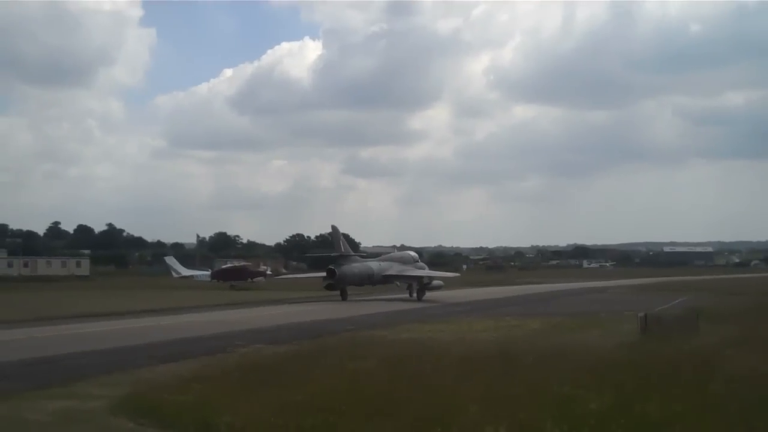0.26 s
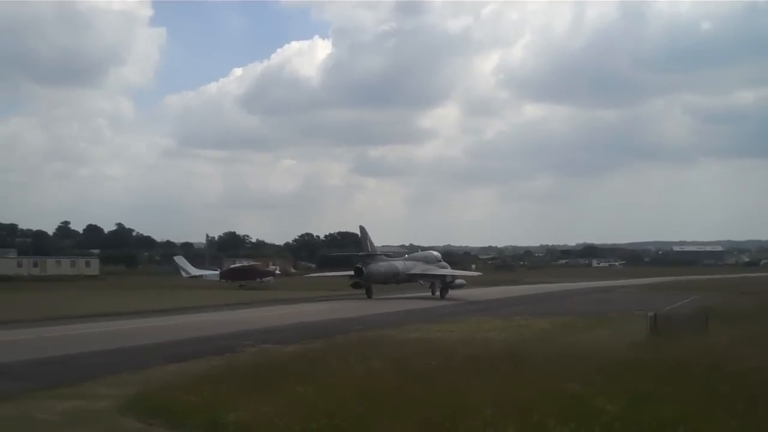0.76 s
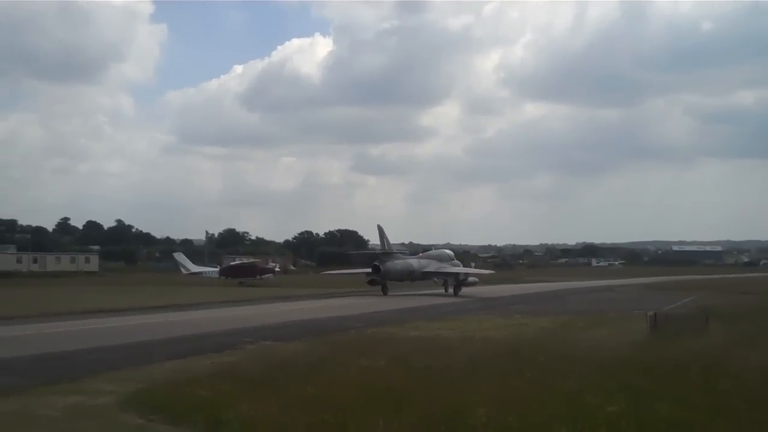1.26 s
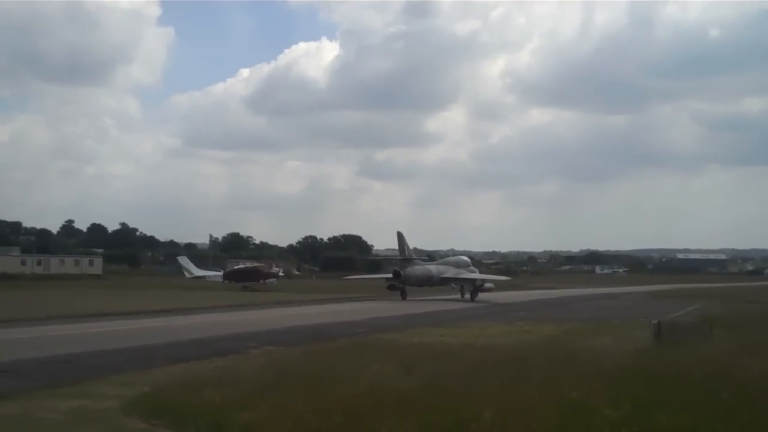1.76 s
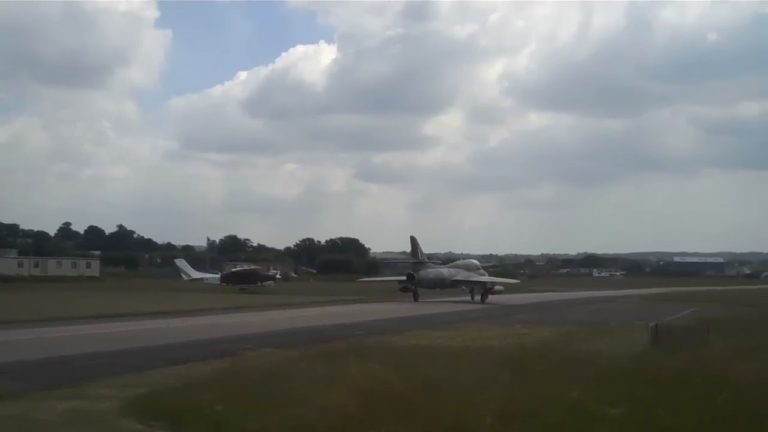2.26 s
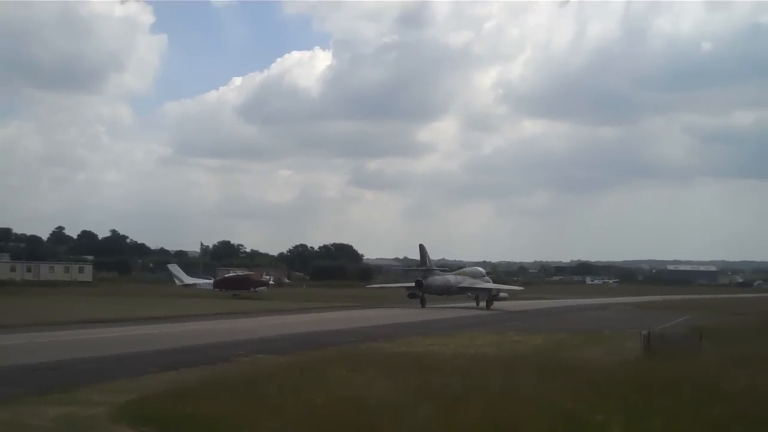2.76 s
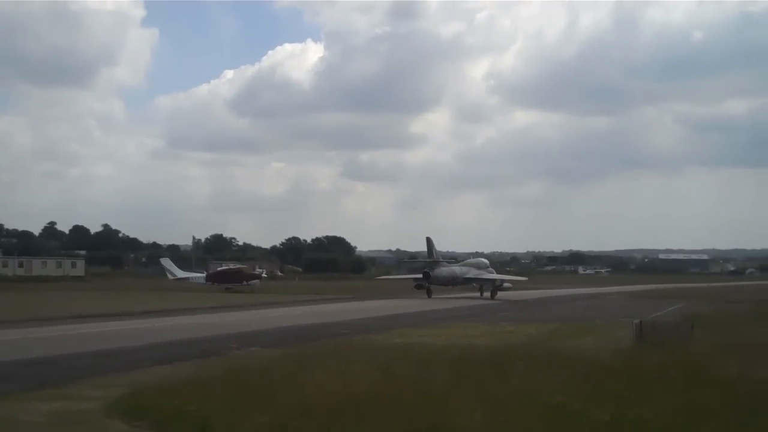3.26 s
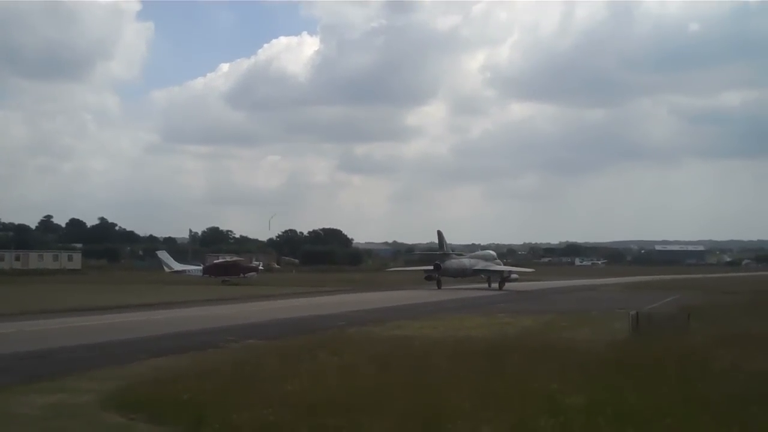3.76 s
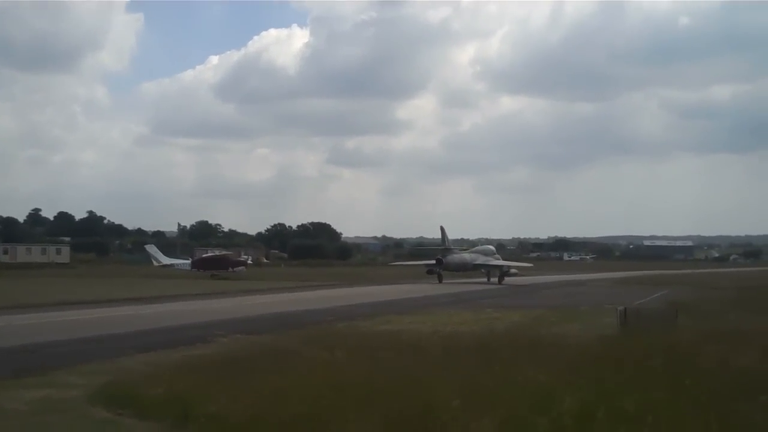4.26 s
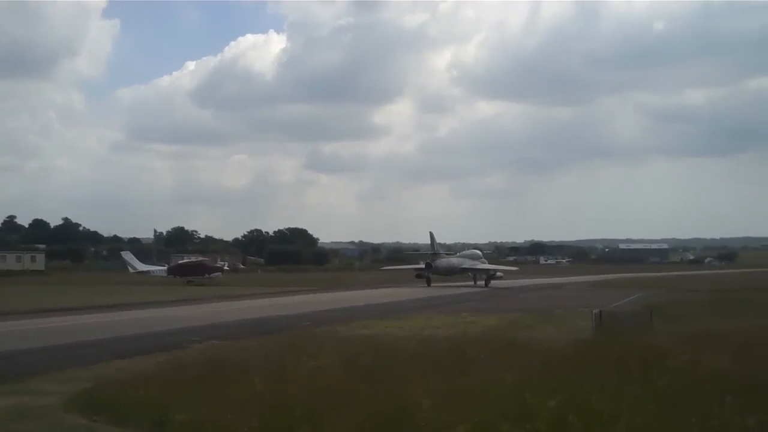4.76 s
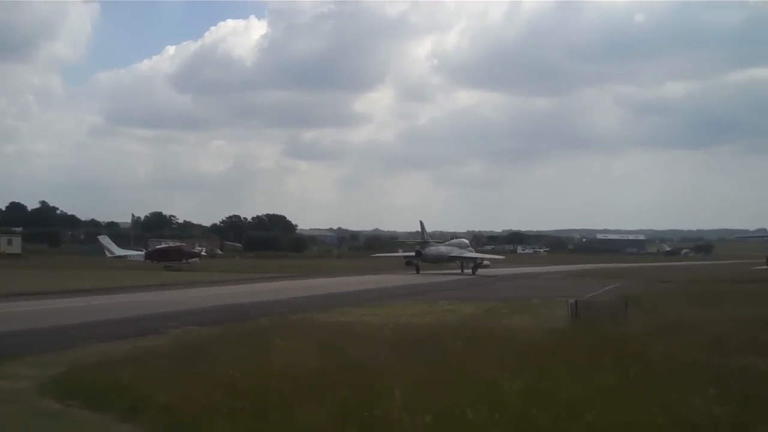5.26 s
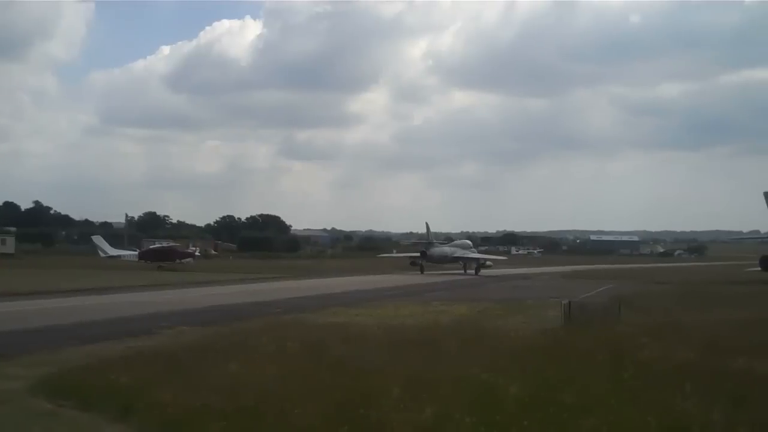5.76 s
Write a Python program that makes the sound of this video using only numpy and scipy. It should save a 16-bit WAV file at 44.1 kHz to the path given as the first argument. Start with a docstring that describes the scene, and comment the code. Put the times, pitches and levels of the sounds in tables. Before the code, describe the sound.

A jet taxis away on an airfield, its piercing whine sliding steadily lower over gusty hiss and hollow howl, with wind buffeting the microphone.

```python
"""A falling compressor whine over gusty hiss, a hollow howl and low roar: a jet taxis away, winding down.
Rotating blades give tones tied to one shaft; turbulent flow gives noise shaped by broad resonances.
Moving air makes the sound swell and swirl on its way, and level falls steadily with distance.
Wind adds rumble and short suction pulses at the microphone."""
import sys
import numpy as np
from scipy import signal
from scipy.fft import rfft, irfft
from scipy.io import wavfile

SR = 44100
rng = np.random.default_rng(int(sys.argv[2]) if len(sys.argv) > 2 else 0)


def unload_wav(signal):
    """Save mono or channel-first audio to the path in sys.argv[1] as 16-bit WAV at rate SR, clipped to [-1, 1]."""
    wavfile.write(
        sys.argv[1],
        SR,
        np.round(np.clip(np.atleast_2d(signal).T, -1, 1) * 32767).astype(np.int16),
    )


N = 264600
FRAME, HOP = 1024, 256  # samples
TIME = np.arange(N) / SR  # s
FRAME_S = np.arange(N // HOP + 5) * HOP / SR
BIN_HZ = np.fft.rfftfreq(FRAME, 1 / SR)
TREMBLE_HZ = 8

# blade-passing pitch of the first compressor stage: time_s, pitch_hz
BLADE_PITCH = [(0, 5795), (.5, 5780), (1.5, 5455), (2.1, 5286), (2.7, 5150), (3.6, 4995), (4.5, 4657),
               (5.4, 4438), (6, 4334)]
# how far the tail has turned to the listener: time_s, share (0-1)
TAIL_TURN = [(0, 0.04), (1.5, 0.27), (3.5, 0), (4.5, 0.93), (6, 0.99)]
# level of the blade sound as the jet turns, with peaks near 3.2 and 5.1 s: time_s, relative_level_db
BLADE_LEVEL = [(0, -5), (.45, -10), (.9, -2), (1.8, -3.5), (2.2, -2.5), (3.2, 2), (3.8, -1), (4.6, -0.5),
               (5.1, 2.5), (6, 0)]


def gain_of(db):
    """Level to amplitude: 20 dB is a factor of ten."""
    return 10 ** (np.asarray(db) / 20)


def evened(x):
    """Power normalization: scales to an rms of one."""
    return x / np.sqrt(np.mean(x ** 2) + 1e-20)


def curve(rows, t=TIME):
    """Linear interpolation: every column of a table, joined by straight lines in time."""
    s, *columns = np.transpose(rows)
    return [np.interp(t, s, c) for c in columns]


def colour(points):
    """Spectral envelope: dB at every bin, interpolated along log frequency."""
    hz, db = np.transpose(points)
    return np.interp(np.log(BIN_HZ + 1), np.log(hz + 1), db)


def hump(hz, width_hz):
    """Broad resonance: a peak in dB at every bin, 6 dB down at the edges of its width."""
    return -20 * np.log10(1 + (2 * (BIN_HZ - hz) / width_hz) ** 2)


def bell(s, length_s, t=TIME):
    """Gaussian envelope: a smooth rise and fall around one moment."""
    return np.exp(-((t - s) / length_s) ** 2)


def surges(rows, t=TIME):
    """Incoherent addition: the summed power of a table of smooth surges."""
    return sum(gain_of(db) ** 2 * bell(s, length_s, t) for s, db, length_s in rows)


def wander(rate_hz):
    """Low-passed Gaussian noise: a smooth random signal of unit rms."""
    hz = np.fft.rfftfreq(N, 1 / SR)
    low_pass = np.exp(-(hz / rate_hz) ** 2)
    return evened(irfft(rfft(rng.standard_normal(N)) * low_pass, N))


def swirl(span_s, span_hz):
    """Scattering by eddies: patches in time and frequency where sound is focused or weakened."""
    z = np.fft.rfft2(rng.standard_normal((len(FRAME_S), len(BIN_HZ))))
    per_s = np.fft.fftfreq(len(FRAME_S), HOP / SR)[:, None]
    per_hz = np.fft.rfftfreq(len(BIN_HZ), SR / FRAME)
    z *= np.exp(-(per_s * span_s) ** 2 - (per_hz * span_hz) ** 2)
    return evened(np.fft.irfft2(z, (len(FRAME_S), len(BIN_HZ))))


def turbulence(field_db):
    """Flow noise: random phases at steady unit power, coloured by a dB field over time and frequency."""
    real, imaginary = rng.standard_normal((2, len(FRAME_S), len(BIN_HZ)))
    shape = gain_of(field_db)
    frame_power_one = shape / np.linalg.norm(shape, axis=-1, keepdims=True)
    z = (real + 1j * imaginary) * frame_power_one
    return evened(signal.istft(z.T, nperseg=FRAME, noverlap=FRAME - HOP)[1][:N])


def path_db(follow):
    """Propagation: loss as the jet recedes, plus a share of the swelling and fading in moving air."""
    # how well moving air carries the sound: time_s, relative_level_db (at follow = 1)
    carry = [(0, 2), (.07, -0.5), (.16, -1), (.55, -2.5), (.8, 1), (1.2, 1.5), (1.92, 0.5), (2.48, 2),
             (2.97, -1.5), (3.2, 1.5), (3.56, 0.5), (3.84, -1), (3.94, 5), (4.1, 1.5), (4.27, 1.5),
             (4.32, -2.5), (4.5, 2), (5.15, 0), (5.78, -1), (6, 1)]
    recede_db_per_s = 1.0
    return follow * curve(carry)[0] - recede_db_per_s * TIME


def tone(hz, scatter, blur_hz):
    """Multipath: a direct path of wavering pitch plus a scattered part that blurs the spectral line."""
    turns = np.cumsum(hz + 12 * wander(42)) / SR
    paths = 1 + scatter * (wander(blur_hz) + 1j * wander(blur_hz))
    return evened((paths * np.exp(2j * np.pi * turns)).real)


def whine():
    """Blade-passing tones: stages on one shaft keep fixed pitch ratios; each trembles by itself."""
    # tones of the other compressor and turbine stages: multiple of the blade pitch
    stage_ratios = [1.06, 1.088, 1.13, 1.325, 1.352, 1.537, 1.643]
    # their levels before blade level and path: side_db, rear_db
    stage_levels = [(-46, -43), (-40.5, -44), (-52, -46), (-55, -51), (-56, -49), (-64, -55), (-63, -47)]
    # flares of the main tone when its direct path clears: centre_s, level_db, length_s
    flares = [(1.08, -37, 0.11), (1.68, -34, 0.071), (2.13, -32.5, 0.1), (2.35, -28, 0.035),
              (2.62, -31, 0.12), (2.99, -28, 0.025), (3.13, -29, .035), (3.25, -30, 0.07),
              (3.54, -35, 0.058), (4.17, -33.5, 0.069), (4.53, -33, 0.077), (5.1, -32.5, 0.063),
              (5.47, -43, 0.13)]
    (pitch_hz,), (blade_db,), (tail_on,) = curve(BLADE_PITCH), curve(BLADE_LEVEL), curve(TAIL_TURN)
    reach_db = blade_db + path_db(follow=1.0)
    tremble_db = 1.5  # rms
    main_db = -39.5 + reach_db + 1 * tail_on + tremble_db * wander(TREMBLE_HZ)
    main_level = np.sqrt(gain_of(main_db) ** 2 + surges(flares))
    out = main_level * tone(pitch_hz, scatter=0.76, blur_hz=44.5)
    for ratio, (side_db, rear_db) in zip(stage_ratios, stage_levels):
        turned_db = side_db + (rear_db - side_db) * tail_on
        stage_db = reach_db + turned_db + tremble_db * wander(TREMBLE_HZ)
        out += gain_of(stage_db) * tone(ratio * pitch_hz, scatter=3.6, blur_hz=49.7)
    return out


def blade_rush():
    """Blade-turbulence interaction: cutting through eddies spreads noise just above the blade pitch."""
    (pitch_hz,), (blade_db,) = curve(BLADE_PITCH, FRAME_S), curve(BLADE_LEVEL)
    patches_db = 2.5 * swirl(span_s=.06, span_hz=450)
    level = gain_of(-35 + blade_db + path_db(follow=2.3))
    return level * turbulence(hump(1.055 * pitch_hz[:, None], width_hz=930) + patches_db)


def intake():
    """Inlet flow noise and duct resonance: hiss, howl and fine fizz, swirled by the same moving air."""
    # broad hiss spectrum: frequency_hz, relative_density_db
    hiss_colour = [(900, -44), (1150, -8), (1420, -5.5), (1650, -6), (2200, -6), (2500, 0), (2800, 1),
                   (3130, -3.5), (3400, 0.5), (3850, -4), (4400, -3.5), (5500, -6.5), (6600, -58),
                   (9000, -63)]
    # fine treble spectrum: frequency_hz, relative_density_db
    fizz_colour = [(4000, -6), (5800, 2.5), (6600, 3), (7500, 1), (8700, -1.5), (9800, -6), (10900, -8),
                   (12000, -15), (13800, -29)]
    (tail_on,) = curve(TAIL_TURN)
    patches = swirl(span_s=0.067, span_hz=630)
    flutter_db = .7 * wander(16)
    howl_waver_db = 1.2 * wander(TREMBLE_HZ)
    # the turning tail hides the intake, hence the negative tail_on terms
    hiss_db = -27 + path_db(follow=1) - 3 * tail_on + flutter_db
    howl_db = -30 + path_db(follow=0.58) - 4.5 * tail_on + howl_waver_db
    fizz_db = -35 + path_db(follow=1.0) - 2.5 * tail_on + flutter_db
    hiss = gain_of(hiss_db) * turbulence(colour(hiss_colour) + 2.0 * patches)
    howl = gain_of(howl_db) * turbulence(hump(hz=1957, width_hz=398) + 2.35 * patches)
    fizz = gain_of(fizz_db) * turbulence(colour(fizz_colour) + 2.8 * patches)
    return hiss + howl + fizz


def swells():
    """Focusing by moving air: short surges of one band of hiss give the jet a wavering vowel."""
    # focused bands: centre_s, centre_hz, level_db, length_s
    focused_bands = [(.046, 2740, -20, 0.036), (0.049, 1950, -20, 0.046), (0.063, 4050, -28.5, 0.032),
                     (0.31, 2760, -28, 0.052), (.3, 1950, -27.5, 0.085), (.783, 3870, -29.5, 0.027),
                     (1.165, 2700, -20.5, 0.053), (1.19, 3700, -22, 0.026), (1.25, 1880, -21.5, 0.18),
                     (1.36, 2880, -27, 0.12), (1.52, 2080, -25.5, 0.051), (1.562, 2870, -22.5, .038),
                     (2.27, 4460, -37, 0.063), (2.54, 2940, -26.5, 0.051), (2.797, 1960, -29, 0.065),
                     (3.074, 1960, -30.5, 0.056), (3.14, 3300, -31, 0.055), (3.27, 2770, -27, 0.082),
                     (3.317, 1370, -37.5, 0.24), (3.51, 4500, -27, 0.051), (3.52, 2900, -28, 0.056),
                     (3.715, 2460, -31, 0.095), (4.01, 3100, -31, 0.091), (4.136, 2000, -30.5, .06),
                     (4.614, 1880, -37.5, .12)]
    power = 1e-14
    for s, hz, db, length_s in focused_bands:
        band = gain_of(db + hump(hz, width_hz=440)) ** 2
        power = power + band * bell(s, length_s, FRAME_S[:, None])
    level = np.interp(TIME, FRAME_S, np.sqrt(power.max(1)))
    return level * turbulence(10 * np.log10(power))


def exhaust():
    """Jet mixing noise: a low roar, a hollow resonant drone above it, and the tail pipe turning into view."""
    # stream strength before each layer's offset: time_s, roar_db, drone_db
    stream_levels = [(0, -36, -37.5), (.45, -41, -37), (1.95, -37, -41.5), (2.05, -36.5, -34.5),
                     (2.4, -41.5, -31), (2.85, -43, -42.5), (3.8, -49.5, -49.5), (5.05, -46.5, -43.5),
                     (5.75, -56.5, -46)]
    # roar spectrum: frequency_hz, relative_density_db
    roar_colour = [(30, -41), (65, -10), (100, 2.5), (135, 7), (190, -5), (280, -26.5), (400, -1.5),
                   (590, 9.5), (740, 2), (1100, 0), (1500, -1), (2500, -27.5)]
    # tail-pipe spectrum heard from behind: frequency_hz, relative_density_db
    pipe_colour = [(500, -15), (800, -7), (1100, 7), (1450, 6.5), (1750, 10.5), (2300, -13), (4000, -21),
                   (8000, -60)]
    (roar_db, drone_db), (tail_on,) = curve(stream_levels), curve(TAIL_TURN)
    patches_db = 1.4 * swirl(span_s=0.22, span_hz=296)
    roar = gain_of(roar_db + 3) * turbulence(colour(roar_colour) + patches_db)
    drone = gain_of(drone_db - 0.5) * turbulence(hump(hz=907, width_hz=225))
    pipe = gain_of(roar_db + 10.0) * tail_on * turbulence(colour(pipe_colour))
    return roar + drone + pipe


def gust_db(t):
    """Incoherent addition: wind strength as the power of gusts over a light breeze."""
    # gusts on the microphone: centre_s, level_db, length_s
    gusts = [(.16, -35.5, .17), (.48, -42, 0.29), (.8, -36, 0.05), (.95, -36, 0.073), (1.92, -41, 0.19),
             (2.28, -39, 0.16), (3.02, -42, 0.12), (3.28, -43, 0.42), (3.73, -42.5, 0.049),
             (3.88, -41, 0.018), (4.08, -35.5, 0.093), (4.27, -36, .09), (4.49, -33, 0.096),
             (4.81, -34, 0.13), (5.17, -34, 0.084), (5.4, -41.5, 0.16), (5.76, -35.5, 0.037),
             (5.92, -38, 0.054)]
    breeze_db = -57.5
    return 10 * np.log10(gain_of(breeze_db) ** 2 + surges(gusts, t))


def wind():
    """Turbulent pressure at the microphone: lumpy rumble whose spectrum brightens in harder gusts."""
    # rumble spectrum: frequency_hz, relative_density_db
    rumble_colour = [(15, -26), (35, -33), (60, -1.5), (100, 7.5), (135, 6), (200, 6.5), (290, -2.5),
                     (450, -11.5), (800, -37), (2000, -74)]
    frame_db = gust_db(FRAME_S)
    brightness = 0.35 * (frame_db - frame_db.mean())[:, None]  # dB per octave
    octaves = np.log2(np.clip(BIN_HZ, 150, 900) / 180)
    rumble = turbulence(colour(rumble_colour) + brightness * octaves)
    lumps = gain_of(3.9 * np.tanh(wander(57)))
    # one surge of pressure at the very bottom of the range
    pressure = gain_of(-41) * bell(s=4.73, length_s=.16) * wander(22)
    low_cut = signal.butter(2, 56.4, "highpass", fs=SR, output="sos")
    lumpy_rumble = evened(signal.sosfilt(low_cut, rumble * lumps))
    return gain_of(gust_db(TIME)) * lumpy_rumble + pressure


def buffets():
    """Vortex pressure: each eddy is a short suction pulse with a ragged, brighter wake."""
    # hardest eddies, strength before a 1 dB cut: centre_s, strength_db, pitch_hz
    hard_eddies = [(.148, -23, 278), (.997, -18.5, 230), (2.058, -21, 242), (3.046, -19.5, 243),
                   (4.092, -15, 354), (4.193, -17.5, 294), (4.333, -19.5, 342), (4.45, -16.5, 244),
                   (4.49, -13.5, 324), (4.522, -15.5, 268), (4.563, -21, 483), (4.789, -21, 287),
                   (4.846, -20.5, 240), (5.156, -20.5, 353)]
    out = np.zeros(N)
    wake = turbulence(hump(hz=415, width_hz=1200))
    eddies = [(s, db - 1.0, hz) for s, db, hz in hard_eddies]
    # lesser eddies come at random, 34 per second, within half an octave of 300 Hz
    for s, pitch in rng.random((round(34 * N / SR), 2)) * [N / SR, 1]:
        eddies.append((s, gust_db(s) + 7, 300 * 2 ** (pitch - .5)))
    for s, level_db, hz in eddies:
        near = slice(max(round(s * SR) - FRAME, 0), round(s * SR) + FRAME)
        t = TIME[near] - s
        u = (np.pi * hz * t) ** 2
        suction = (2 * u - 1) * np.exp(-u)
        ragged = 0.37 * wake[near] * np.exp(-abs(t) / 0.0032)
        out[near] += gain_of(level_db) * (suction + ragged)
    return out


def scene():
    """Superposition: the jet in open air, and the wind close by."""
    jet = whine() + blade_rush() + intake() + swells() + exhaust()
    return (jet + wind() + buffets())[None]


def record(dry):
    """Band limiting: a steep linear-phase low-pass filter."""
    edge_hz = 13750
    low_pass = signal.firwin(511, edge_hz, window=("kaiser", 9), fs=SR)
    return signal.oaconvolve(dry, low_pass[None], "same")


dry = scene()
out = record(dry)
unload_wav(out)
```